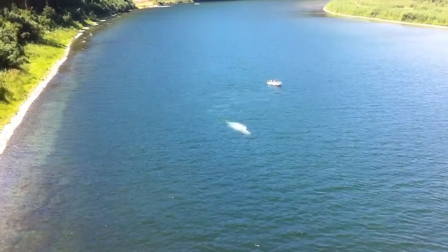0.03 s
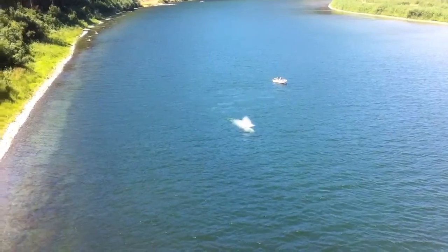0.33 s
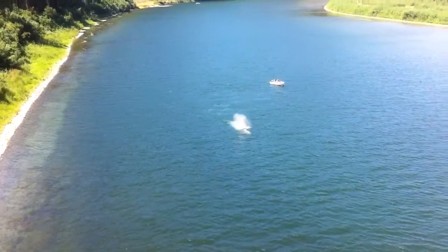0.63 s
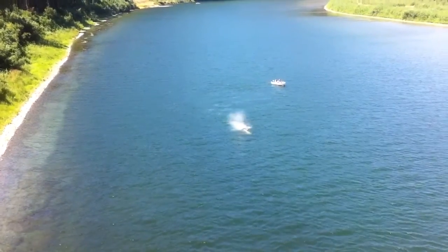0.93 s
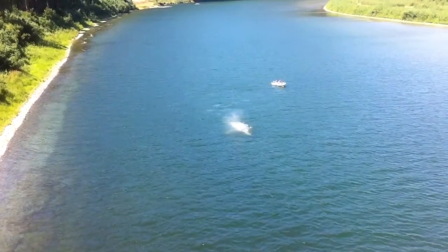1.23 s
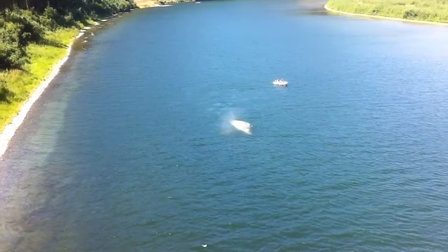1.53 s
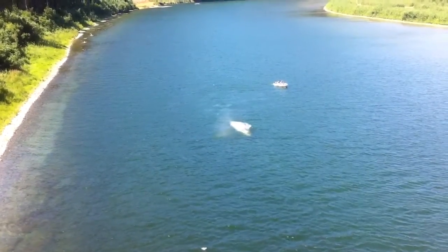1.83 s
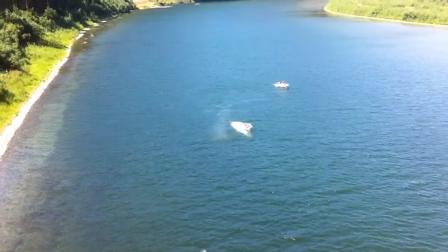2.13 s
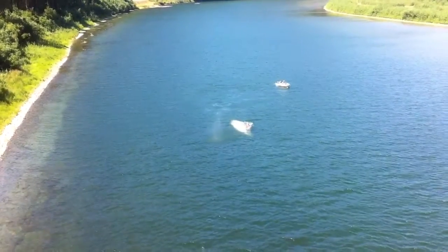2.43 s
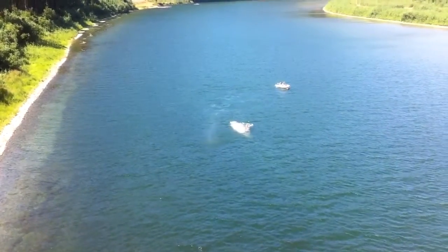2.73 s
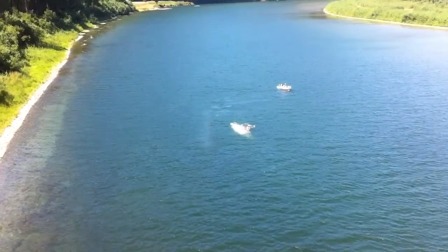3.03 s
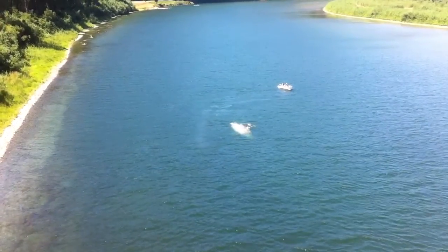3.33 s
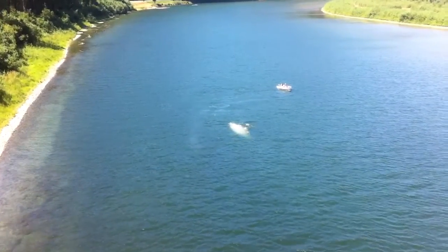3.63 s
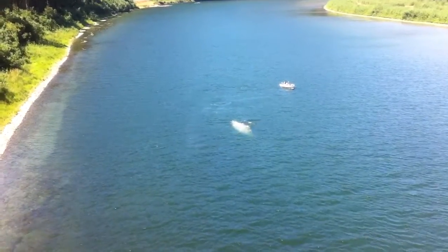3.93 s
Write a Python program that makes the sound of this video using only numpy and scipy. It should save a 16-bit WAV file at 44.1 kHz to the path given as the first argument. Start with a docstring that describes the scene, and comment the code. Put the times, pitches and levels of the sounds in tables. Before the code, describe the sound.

Gusty wind rumbles and flutters on a microphone above a wide river, thumping in the first half second and hardest around 2.3 seconds, just after a faint dull tick. A distant rush of water and traffic continues throughout, swelling and brightening from about 2.7 seconds with a breathy whistling tone in it. A faint, thin high whistle passes near 0.9 seconds, and a far motor hums softly underneath.

```python
"""Gusty wind buffets a microphone high above a wide river, hardest a little after two seconds.
Up close, eddies rumble, flutter and thump on the microphone port, with one faint dull tick.
Far off, water and traffic make an even rush with a breathy whistling band in it; the rush swells
and brightens in the second half. A thin hissing whistle sounds once, and a far motor hums faintly."""
import sys
import numpy as np
from scipy import signal
from scipy.fft import rfft, irfft, next_fast_len
from scipy.io import wavfile
from scipy.ndimage import uniform_filter1d, map_coordinates

SR = 44100
rng = np.random.default_rng(int(sys.argv[2]) if len(sys.argv) > 2 else 0)


def file_out(sig):
    """Save sig as 16-bit WAV at sys.argv[1]."""
    # one column per channel
    cols = np.atleast_2d(sig).T
    # limit, then scale
    lim = np.clip(cols, -1, 1)
    pcm = np.round(lim * 32767).astype(np.int16)
    wavfile.write(sys.argv[1], SR, pcm)


N = 176400

# wind rumble on the microphone: time_s, level_db (before trim)
RUMBLE_LEVELS = [(0.02, -26.5), (0.25, -30.5), (0.42, -33), (0.5, -34), (0.63, -29), (0.97, -34.5),
                 (1.13, -28.5), (1.33, -35.5), (1.75, -33), (1.85, -32), (2.1, -31.5), (2.28, -27.5),
                 (2.45, -31.5), (2.7, -33), (2.92, -31.5), (3.1, -34.5), (3.32, -28.5), (3.5, -31),
                 (3.66, -33), (3.77, -27), (3.85, -31), (4, -31.5)]
# brighter flutter in the gusts: time_s, level_db
FLUTTER_LEVELS = [(0, -38), (.15, -34), (.5, -41.5), (.66, -33), (.85, -34.5), (1.0, -38), (1.2, -38),
                  (1.45, -39), (1.85, -39), (2.1, -34.5), (2.25, -30.5), (2.4, -32.5), (2.47, -40.5),
                  (2.54, -38.5), (3.05, -41), (3.35, -48), (3.55, -36), (4, -46)]
# hardest thumps on the port: time_s, peak_db, pitch_hz, half_length_s
BUFFETS = [(0.116, -17, 190, 0.009), (0.247, -19.5, 209, 0.0064), (0.39, -22, 217, .008),
           (1.812, -22, 188, .005), (2.222, -22, 240, .005), (2.257, -14, 211, 0.0062),
           (2.335, -17, 230, 0.0053), (2.37, -19, 205, 0.0098), (3.756, -25, 185, 0.009)]
# spectra of the close sounds: frequency_hz, relative_db
RUMBLE_COLOUR = [(25, -50), (40, -43), (70, -19), (105, -9), (150, 1), (220, -0.5), (300, -5.5),
                 (450, -13.5), (800, -31.5), (2000, -75)]
FLUTTER_COLOUR = [(120, -27), (250, 2.5), (400, 1), (600, -7.5), (900, -10.5), (1400, -20.5), (2500, -25.5),
                  (6000, -69)]
TICK_COLOUR = [(300, -12), (900, 4), (1600, 2), (2100, -4), (3500, -35)]

# distant rush and its treble hiss: time_s, level_db (before trim)
RUSH_LEVELS = [(0, -41.5), (.7, -42), (1.2, -43.5), (1.9, -41), (2.3, -41), (2.7, -40), (3.2, -36),
               (3.6, -37), (4, -33.5)]
HISS_LEVELS = [(0, -61.5), (.7, -60), (1.15, -62.5), (1.8, -61), (2.25, -61), (2.55, -57.5), (3.2, -54),
               (4, -51.5)]
# distant midrange roar, fading away and returning near the end: time_s, level_db
ROAR_LEVELS = [(0, -40), (2.6, -67.5), (3.1, -48.5), (3.5, -42), (3.75, -37.5), (4, -38)]
# spectra of the water and traffic: frequency_hz, relative_db
RUSH_COLOUR = [(100, -49), (400, -7.5), (800, -16), (1100, -10), (1330, -7), (1600, -13), (1950, -7),
               (2250, -1), (2480, -0.5), (2750, -6.5), (3050, -15.5), (3700, -21.5), (8000, -44)]
HISS_COLOUR = [(1500, -20), (3200, -3), (4000, -2), (4700, 1.5), (5500, -1.5), (6400, 2), (7100, -1),
               (8200, -10), (10000, -11), (12300, -14.5), (13500, -13), (14300, -15), (15200, -31),
               (16000, -27)]
ROAR_COLOUR = [(150, -36), (450, 8), (750, 8), (1050, 5.5), (1300, 2.5), (1600, 2.5), (2000, -12),
               (3200, -3), (4500, -40), (12000, -34)]
# whistling band in the rush: time_s, pitch_hz, level_db
SINGING_BAND = [(0, 2450, -50.5), (1.15, 2448, -56.5), (1.55, 2447, -48.5), (2.2, 2450, -51.5),
                (2.7, 2440, -42), (3.2, 2430, -43.5), (3.55, 2490, -38), (3.75, 2540, -45.5),
                (4, 2470, -38.5)]
# two steps of the thin whistle: start_s, length_s, pitch_hz, half_width_hz, level_db
WHISTLE_STEPS = [(0.802, 0.15, 5980, 400, -54.5), (0.897, 0.17, 5290, 75, -59)]
# far motor hum: time_s, level_db
MOTOR_LEVELS = [(0, -39), (1.5, -46.5), (2.8, -39), (3.4, -37), (4, -38)]

RUMBLE_TRIM_DB, RUSH_TRIM_DB, HISS_TRIM_DB = 0.74, 1, 8
TICK_START_S, TICK_DECAY_S, TICK_GAIN_DB = 2.124, 0.0025, -26
WHISTLE_RISE_S, WHISTLE_FALL_S = 0.011, 0.056
MOTOR_HZ, MOTOR_DRIFT_HZ = 203.2, 4.5
BAND_LIMIT_HZ = 15700


def wind():
    """Eddies rumble right on the microphone; stronger gusts add a brighter flutter."""
    eddies = wobble(55)
    rumble = unit(noise(RUMBLE_COLOUR, patchy_db=0.5) * amp(0.68 * eddies))
    flutter = unit(noise(FLUTTER_COLOUR, patchy_db=1.46) * amp(0.88 * eddies + 0.84 * wobble(110)))
    return amp(curve(RUMBLE_LEVELS) + RUMBLE_TRIM_DB) * rumble + amp(curve(FLUTTER_LEVELS)) * flutter


def buffets():
    """Single strong eddies thump the microphone port for a few cycles."""
    t, out = np.arange(N) / SR, np.zeros(N)
    grit = 0.08 * noise(FLUTTER_COLOUR, patchy_db=-4.5)
    for time_s, peak_db, pitch_hz, half_length_s in BUFFETS:
        thump = np.sin(2 * np.pi * (pitch_hz * (t - time_s) + rng.random()))
        envelope = np.exp(-((t - time_s) / half_length_s) ** 2)
        out += amp(peak_db) * envelope * (thump + grit)
    return out


def tick():
    """A faint dull tick just before the main gust."""
    age = np.maximum(np.arange(N) / SR - TICK_START_S, 0) / TICK_DECAY_S
    envelope = (1 - np.exp(-2 * age)) * np.exp(-age)
    return amp(TICK_GAIN_DB) * envelope * noise(TICK_COLOUR, patchy_db=0)


def water_and_traffic():
    """River and traffic from a distance: a nasal rush, fine hiss above it and a roar below."""
    rush_db = curve(RUSH_LEVELS) + RUSH_TRIM_DB + 0.4 * wobble(8.65)
    rush = amp(rush_db) * noise(RUSH_COLOUR, patchy_db=1.08)
    hiss_db = curve(HISS_LEVELS) + HISS_TRIM_DB + 0.35 * wobble(18) + 0.68 * wobble(120)
    hiss = amp(hiss_db) * noise(HISS_COLOUR, patchy_db=0.86)
    roar = amp(curve(ROAR_LEVELS)) * noise(ROAR_COLOUR, patchy_db=0.7)
    return rush + hiss + roar


def singing_rush():
    """The distant rush focuses into a breathy whistle that swells and lifts a little near the end."""
    time_s, pitch_hz, level_db = np.transpose(SINGING_BAND)
    gain = amp(curve(np.c_[time_s, level_db]) + 1.2 * wobble(16))
    return gain * narrow_band(curve(np.c_[time_s, pitch_hz]), half_width_hz=130)


def thin_whistle():
    """A brief high hiss steps down to a thinner, purer tail."""
    t, out = np.arange(N) / SR, np.zeros(N)
    for start_s, length_s, pitch_hz, half_width_hz, level_db in WHISTLE_STEPS:
        rise = np.clip((t - start_s) / WHISTLE_RISE_S, 0, 1)
        fall = np.exp(-np.maximum(t - start_s - length_s, 0) / WHISTLE_FALL_S)
        out += amp(level_db + 1.6 * wobble(60.8)) * rise * fall * narrow_band(pitch_hz, half_width_hz)
    return out


def far_motor():
    """One wavering tone from a far motor, fading in and out on the wind."""
    phase = 2 * np.pi * np.cumsum(MOTOR_HZ + MOTOR_DRIFT_HZ * wobble(20)) / SR
    return amp(curve(MOTOR_LEVELS)) * unit(np.sin(phase) * amp(2.8 * wobble(18)))


def amp(db):
    """Decibels to gain."""
    return 10 ** (np.asarray(db) / 20)


def unit(x):
    """Scale to rms 1."""
    return x / np.sqrt(np.mean(x ** 2) + 1e-20)


def curve(rows):
    """Rows of time_s, value joined into one value per sample."""
    return np.interp(np.arange(N) / SR, *np.transpose(rows))


def wobble(knots_per_s):
    """A smooth random curve."""
    return map_coordinates(rng.standard_normal(1024), [np.arange(N) * knots_per_s / SR], mode="wrap")


def filtered(x, response):
    """Weight the spectrum of x by the gain response(hz)."""
    size = next_fast_len(N + SR // 2)
    return irfft(rfft(x, size) * response(np.fft.rfftfreq(size, 1 / SR)), size)[:N]


def noise(colour, patchy_db):
    """Coloured noise of rms 1 with patches of random gain across frequency and time."""
    spectra = signal.stft(rng.standard_normal(N), nperseg=512)[2]
    patches = uniform_filter1d(rng.standard_normal(spectra.shape), size=8, axis=0)
    patches = uniform_filter1d(patches, size=14, axis=1)
    patchy = signal.istft(spectra * amp(patchy_db * unit(patches)), nperseg=512)[1][:N]
    points_hz, db = np.transpose(colour)
    return unit(filtered(patchy, lambda hz: amp(np.interp(np.log(hz + 1), np.log(points_hz), db))))


def narrow_band(centre_hz, half_width_hz):
    """A narrow band of noise of rms 1 around a steady or moving centre."""
    def slow_noise():
        return unit(filtered(rng.standard_normal(N), lambda hz: 1 / (1 + (hz / half_width_hz) ** 2)))
    phase = 2 * np.pi * np.cumsum(centre_hz * np.ones(N)) / SR
    return slow_noise() * np.cos(phase) + slow_noise() * np.sin(phase)


def scene():
    """One microphone above the river: close wind over the distant sounds."""
    close = wind() + buffets() + tick()
    return (close + water_and_traffic() + singing_rush() + thin_whistle() + far_motor())[None]


def record(dry):
    """The recorder keeps nothing above its band limit."""
    return filtered(dry[0], lambda hz: hz < BAND_LIMIT_HZ)[None]


dry = scene()
out = record(dry)
file_out(out)
```